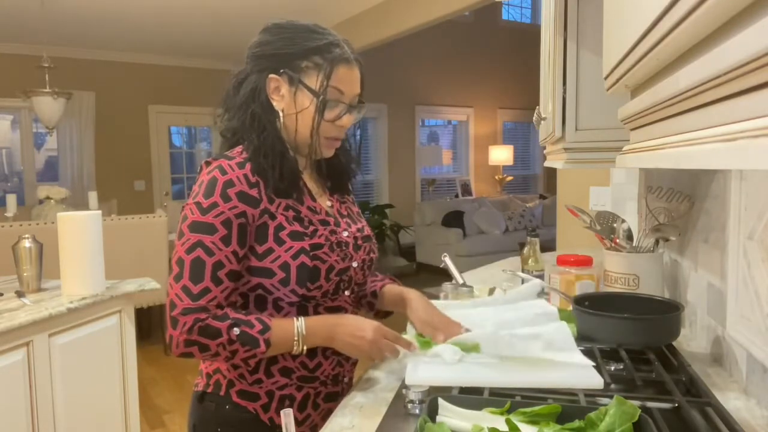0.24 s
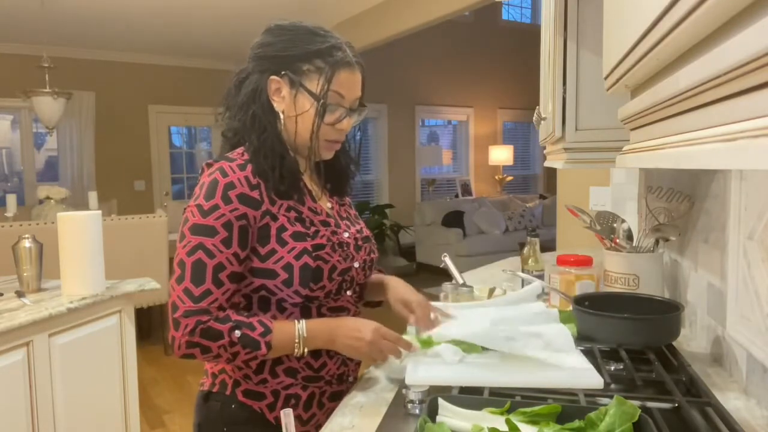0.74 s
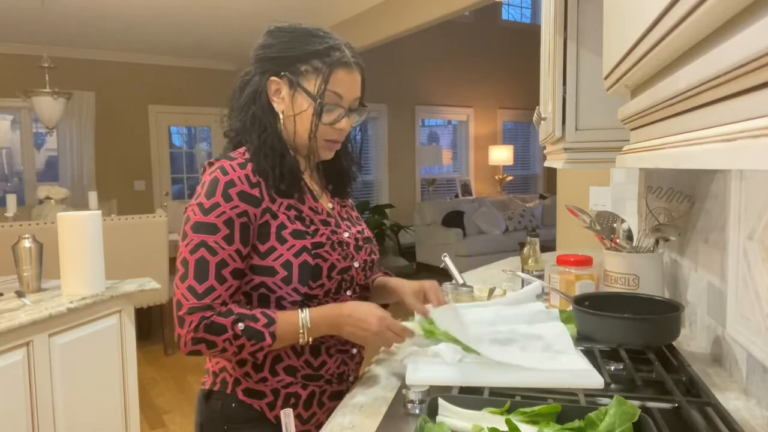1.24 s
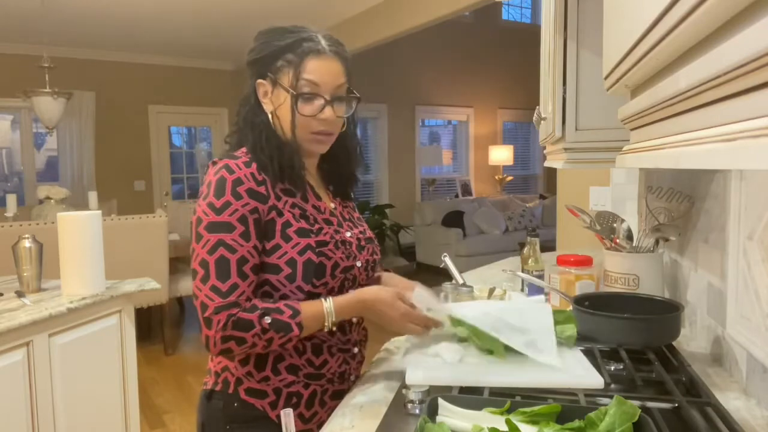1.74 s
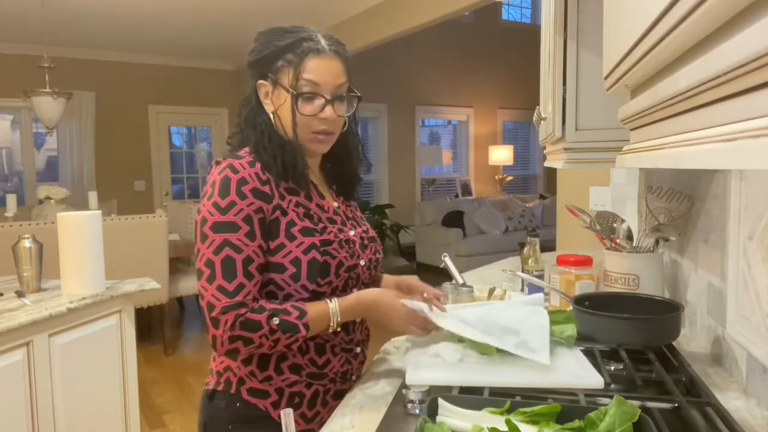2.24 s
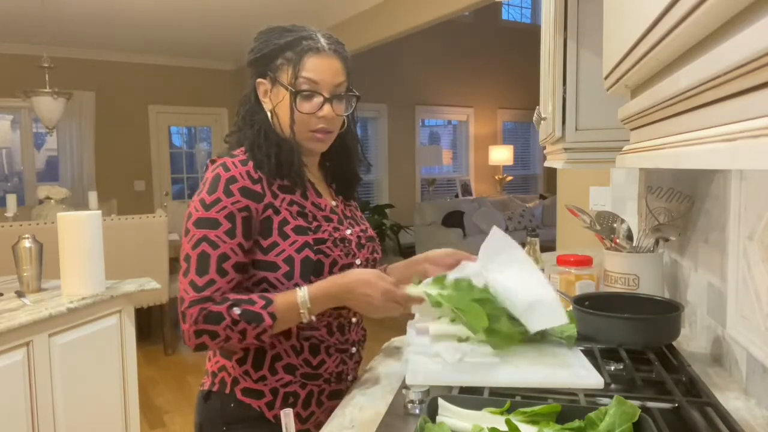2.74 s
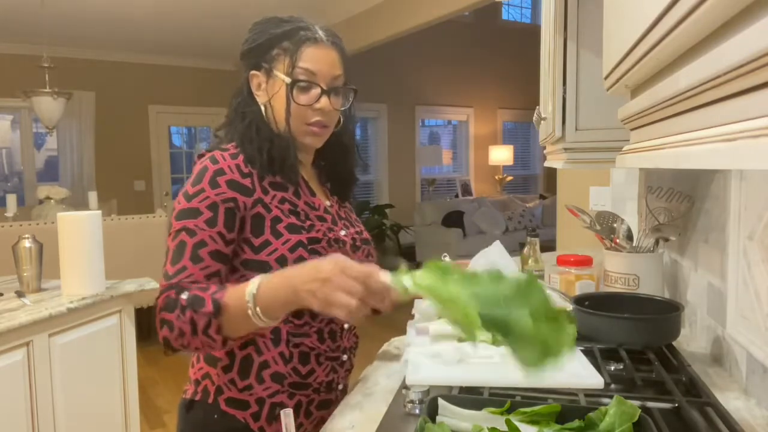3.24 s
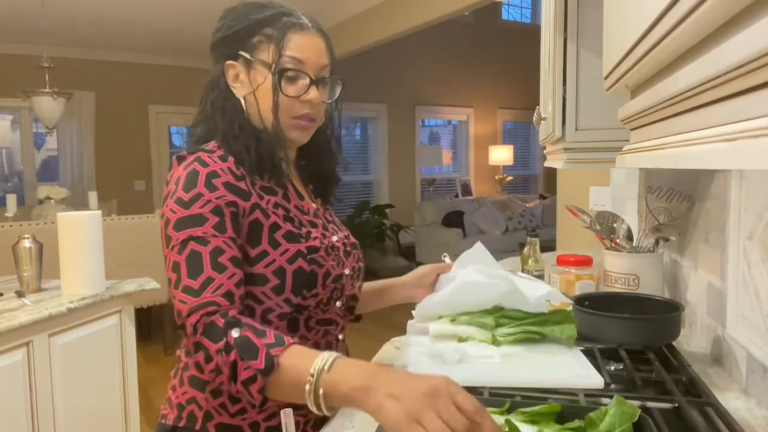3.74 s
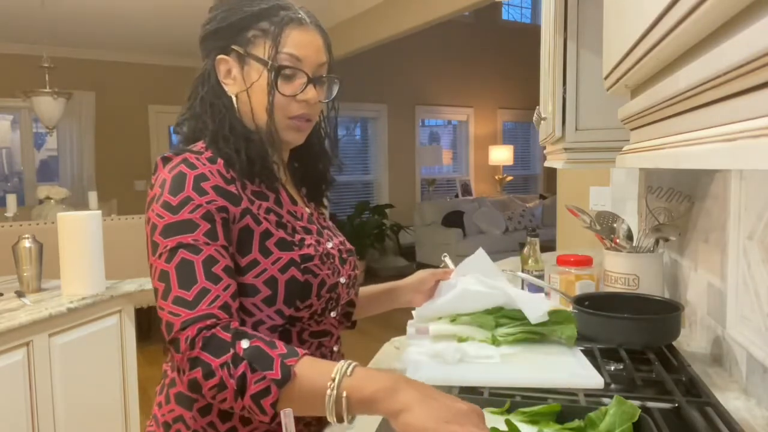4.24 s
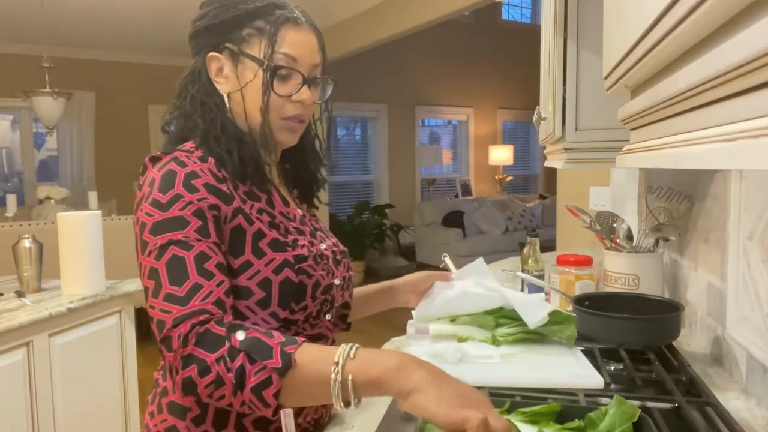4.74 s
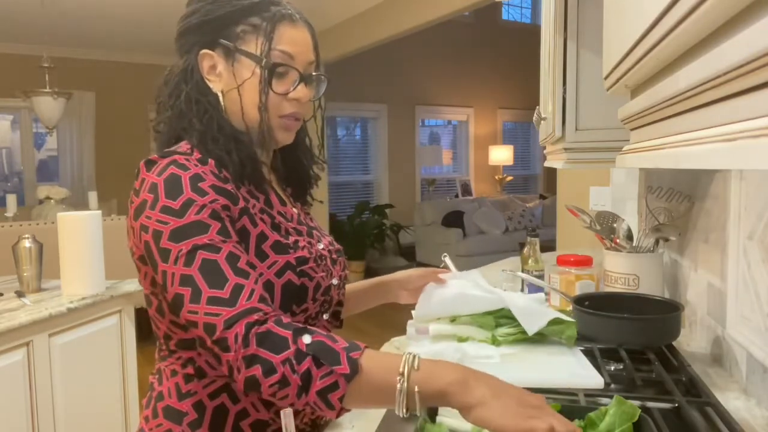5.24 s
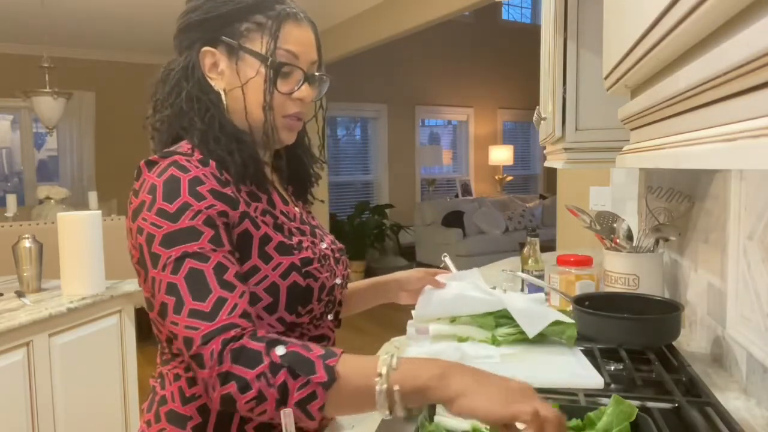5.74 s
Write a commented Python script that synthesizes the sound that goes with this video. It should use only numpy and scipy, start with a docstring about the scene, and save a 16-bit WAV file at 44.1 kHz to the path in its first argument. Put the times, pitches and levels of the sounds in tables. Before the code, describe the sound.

Wet leafy greens fry in hot oil, heard close in stereo in a home kitchen with short, slightly dull reflections. Throughout, a fine uneven hiss flickers and stutters, covered with dense tiny spits, bubbly ticks and crisp dry crackles. Below it sit a low, slowly throbbing motor hum, soft fan rumble and a very faint hollow note from the hood. Soft, low hand pats through paper on a board land around 0.3 and 1.0 seconds, again near 2.2 and 4.05, and very faintly at 5.9. Sharp pops gather from 0.48, with the loudest at about 0.68, ringing the steel pan briefly. Another strong snap comes at 2.24, then a rapid cluster with a dull pan knock at 3.85 to 3.9. The sizzle dips about 3.8 and surges at 4.05; a lower, knocking pop follows at 4.42. Smaller crackles continue, and the hiss strengthens toward six seconds.

```python
"""On a kitchen hob, wet leaves sear in hot oil close to a pair of microphones.
Motor hums beat together under air rumble and a faint hood note: sine waves and filtered noise.
The fizz is uneven noise in flickering bands. Spits, pops and crackles are bursting water drops:
noise and a click shaped into a bubble note, a dull knock and a bright crack that ring the pan.
A hand pats the board with low noise and a tone; short low knocks jolt the pan."""
import sys
import numpy as np
from scipy import signal
from scipy.fft import rfft, irfft, next_fast_len
from scipy.io import wavfile

SR = 44100
rng = np.random.default_rng(int(sys.argv[2]) if len(sys.argv) > 2 else 0)


def unload_wav(signal):
    """Save mono or channel-first audio to the path in sys.argv[1] as 16-bit WAV at rate SR, clipped to [-1, 1]."""
    wavfile.write(
        sys.argv[1],
        SR,
        np.round(np.clip(np.atleast_2d(signal).T, -1, 1) * 32767).astype(np.int16),
    )


N = 263277


def amp(db):
    """Turn decibels into a plain multiplier."""
    return 10 ** (np.asarray(db) / 20)


def rms_one(x):
    """Scale a sound so its average strength (rms) is 1."""
    return x / np.sqrt(np.mean(x ** 2) + 1e-20)


def in_time(rows):
    """Draw straight lines through timed rows, one value per sample for each column."""
    row_s, *columns = np.transpose(rows)
    return [np.interp(np.arange(N) / SR, row_s, column) for column in columns]


def at_hz(points, hz):
    """Read a curve at one pitch, with pitch spaced in octaves."""
    curve_hz, values = np.transpose(points)
    return np.interp(np.log(hz), np.log(curve_hz), values)


def butter(x, hz, kind, order=2):
    """Keep the low, high or middle part of a sound with a smooth filter."""
    return signal.sosfilt(signal.butter(order, hz, kind, fs=SR, output="sos"), x)


def resonance(x, hz, width_hz):
    """Ring at one pitch: a two-pole filter with gain 1 at its peak."""
    r = np.exp(-np.pi * width_hz / SR)
    top = np.array([1, 0, -1]) * (1 - r * r) / 2
    bottom = [1, -2 * r * np.cos(2 * np.pi * hz / SR), r * r]
    return signal.lfilter(top, bottom, x)


def drift(rate_hz):
    """Wander at random with spread 1: noise smoothed twice, one step every 40 samples."""
    r = np.exp(-80 * np.pi * rate_hz / SR)
    noise = rng.standard_normal(N // 40 + 2002)
    slow = signal.lfilter([1], [1, -2 * r, r * r], noise)[2000:]  # skip the filter's start
    return np.interp(np.arange(N) / 40, np.arange(len(slow)), rms_one(slow))


def spiky(shape, spread_db):
    """Make noise whose grains differ widely in strength, rms 1."""
    boost_db = spread_db * np.minimum(rng.exponential(1, shape), 5)
    return rms_one(rng.standard_normal(shape) * amp(boost_db))


def delay(ms, size):
    """Delay by turning the phase of each frequency, so parts of a sample count."""
    return np.exp(-2j * np.pi * np.arange(size // 2 + 1) / size * ms * SR / 1000)


# steady motor tones: pitch_hz, level_db (rms, before a small drift)
MOTOR_TONES = [(47.1, -66), (53.01, -52.8), (55.66, -54.3), (99.6, -63), (106.05, -54), (236.9, -64),
               (473.7, -68), (947.4, -72)]
IN_STEP_S = 2.97  # the moment when the motors pull together


def hum():
    """Add motor tones as sine waves; the close pair near 54 Hz throbs."""
    t = np.arange(N) / SR - IN_STEP_S
    out = 0
    for hz, db in MOTOR_TONES:
        level = np.sqrt(2) * amp(db + .7 * drift(1.5))
        out = out + level * np.cos(2 * np.pi * hz * t)
    return out


# tone of the fan and room rumble: pitch_hz, relative_level_db (per Hz)
AIR_TONE = [(18, -33), (30, -4), (59, 3.5), (108, 8), (126, 0), (183, -5.5), (257, -5.5), (347, -13),
            (468, -5.5), (517, -26), (631, -14), (717, -10.5), (900, -12), (1170, -49), (1980, -120)]
# how alike left and right are: pitch_hz, likeness (no unit, 1 is identical)
AIR_LIKENESS = [(60, 0.98), (130, 0.72), (290, 0.32), (640, 0.021)]
AIR_DB = -51  # whole rumble, rms


def air():
    """Fan and room rumble: noise in third-octave bands, alike left and right only in the bass."""
    white, out = rng.standard_normal((2, 2, N)), 0
    edges = 32 * 2 ** np.arange(0, 5, 1 / 3)
    for k, (low, high) in enumerate(zip(edges, edges[1:])):
        mid, side = butter(white[k % 2], [low, high], "band")
        hz = np.sqrt(low * high)
        alike = np.clip(at_hz(AIR_LIKENESS, hz), -1, 1)
        stereo = np.sqrt(1 + alike) * mid + np.sqrt(1 - alike) * side * [[1], [-1]]
        out = out + amp(at_hz(AIR_TONE, hz)) * stereo
    return amp(AIR_DB) * rms_one(out)


DUCT_HZ, DUCT_WIDTH_HZ, DUCT_DB = 270.7, 36, -57  # level is rms


def duct():
    """Air sings faintly in the hood: noise sent twice through one narrow resonance."""
    noise = rng.standard_normal((2, N))
    once = resonance(noise, DUCT_HZ, DUCT_WIDTH_HZ)
    return amp(DUCT_DB) * rms_one(resonance(once, DUCT_HZ, DUCT_WIDTH_HZ))


# strength of the frying: start_s, fizz_level_db, dull_boost_db (raises the fizz below 2500 Hz)
FRYING = [(0.0, -49, 4), (0.5, -51, 6), (0.7, -48, 7), (1.3, -49.5, 0), (1.95, -50.5, 3), (2.3, -49.5, 4.5),
          (2.77, -49, 0), (3.14, -51, 2.5), (3.79, -53, 6), (4.06, -47.5, 8.5), (4.4, -51, 7.5),
          (4.92, -49.5, 6.5), (5.44, -48.5, 7), (5.97, -45.5, 3)]
# tone of the fizz: pitch_hz, relative_level_db (per Hz)
FIZZ_TONE = [(300, -20), (600, -11), (1200, -8), (1900, -5), (2800, -4), (4500, 0), (7000, -1), (9000, -1),
             (12000, -3), (15500, -3)]


def fizz():
    """Fine frying noise in each quarter of the pan; neighbouring bands flicker partly together."""
    level_db, dull_db = in_time(FRYING)
    grains, out = spiky((2, 4, N), spread_db=6.5), 0
    sputter = drift(40.0)  # all bands stutter at once
    together = drift(7.0)
    edges = 350 * 2 ** np.arange(0, 5.6, .5)
    for k, (low, high) in enumerate(zip(edges, edges[1:])):
        hz = np.sqrt(low * high)
        flicker_db = 2.8 * together + 2.2 * drift(22.0) + 2.0 * sputter
        band_db = at_hz(FIZZ_TONE, hz) + flicker_db + dull_db * (hz < 2500)
        out = out + amp(band_db) * butter(grains[k % 2], [low, high], "band")
    return amp(level_db) * rms_one(out)


def fizz_db_at(start_s):
    """Look up the fizz level at given moments."""
    return np.interp(start_s, *np.transpose(FRYING)[:2])


BREAK = 9  # height of the first click over the rms of the unshaped spray
THUMP_DB = 5  # the click strikes the knock harder than the crack
SWELL_S, SWELL_DB = .005, -17  # a faint, short rise of noise leads into each burst


def bursts(rows, size):
    """Noise rises faintly, then a click and ragged spray make a bubble note, a knock and a crack."""
    start_s, db, hz, dull_db, bright_db, t60, dull_hz = np.transpose(rows)[:, :, None]
    first = SR // 50  # 20 ms of room for the faint rise
    t, out = (np.arange(size) - first) / SR, np.zeros((4, N + size))
    after = np.maximum(t, 0)
    fade = amp(-60 * after / np.maximum(t60, .005))
    snap = amp(8 - 60 * after / .014)
    swell = amp(SWELL_DB) * np.exp(-np.abs(t) / SWELL_S)
    shape = np.minimum(after / 0.0024, 1) * (fade + snap) + swell
    spray = spiky((len(start_s), 2, size), spread_db=4.5) * shape[:, None]
    # the skin breaks: one click through every band
    click_sign = rng.choice([-1, 1], (len(start_s), 1))
    spray[:, :, first + SR // 700] += BREAK * amp([THUMP_DB, 0]) * click_sign
    spray[:, 0] = butter(spray[:, 0], 3600, "low")  # the knock is a soft contact
    knock = butter(spray[:, 0], [600, 3000], "band")
    knock += 0.9 * butter(spray[:, 0], [260, 600], "band")
    crack = butter(spray[:, 1], 6200, "high")
    for k in range(len(start_s)):
        note = resonance(spray[k, 1], hz[k, 0], 0.4 * hz[k, 0])
        knock[k] += 5.0 * resonance(spray[k, 0], dull_hz[k, 0], 1.1 * dull_hz[k, 0])
        burst = amp(db[k]) * note / np.abs(note).max()
        # knock and crack are levelled over the first 20 ms
        burst += amp(dull_db[k]) * knock[k] / knock[k, first:2 * first].std()
        burst += amp(bright_db[k]) * crack[k] / crack[k, first:2 * first].std()
        at = round(start_s[k, 0] * SR)
        out[k % 4, at:at + size - first] += burst[first:]  # the quarters take turns
        out[k % 4, max(at - first, 0):at] += burst[max(first - at, 0):first]
    return out[:, :N]


SPITS_PER_S, SPIT_OVER_FIZZ_DB = 120, 9.5  # level before each drop's size is added


def spits():
    """Small drops burst at random moments; the louder the fizz, the louder the spits."""
    when, size, pitch, dull, bright, length = rng.random((round(SPITS_PER_S * N / SR), 6)).T
    start_s = when * N / SR
    db = fizz_db_at(start_s) + SPIT_OVER_FIZZ_DB - 3.5 * np.log(size + 0.06)  # few are loud
    dull_db, bright_db = db - 40 + 14 * dull, db - 30 + 14 * bright
    bubble_hz, knock_hz = 2000 * 3.6 ** pitch, 600 * 4.0 ** dull
    t60_s = 0.018 + 0.012 * length
    rows = [start_s, db, bubble_hz, dull_db, bright_db, t60_s, knock_hz]
    return bursts(np.transpose(rows), size=2200)


# listed drops, loud and faint, before the pan rings: start_s, bubble_peak_db, bubble_pitch_hz,
# knock_level_db, crack_level_db (both rms over 20 ms), t60_s (time to fade by 60 dB), knock_pitch_hz
LISTED_POPS = [(0.0212, -39, 5430, -48, -37.5, 0.055, 1430), (0.1513, -30, 4620, -49, -33.5, 0.051, 802),
               (0.3044, -24.5, 4740, -48, -41, 0.04, 746), (0.3559, -21.5, 3980, -69, -49, 0.074, 711),
               (0.3654, -48, 6000, -50, -37.5, 0.052, 756), (0.4619, -23, 4630, -46, -37, 0.089, 1580),
               (0.4828, -14.5, 3970, -46, -29.5, 0.075, 1730), (0.495, -42, 4400, -39, -50, 0.078, 1680),
               (0.5251, -20, 3580, -40.5, -35, 0.14, 810), (0.5319, -24, 5000, -42, -27.5, 0.065, 1520),
               (0.5473, -30, 2520, -41, -49, 0.051, 1630), (0.5685, -23, 4800, -58, -31.5, 0.027, 1140),
               (0.6391, -24.5, 4000, -63, -51, 0.13, 1510), (0.67, -28, 4700, -65, -57, 0.1, 1900),
               (0.677, -25, 5500, -50, -50, 0.04, 1900), (0.681, -3.5, 3670, -35, -51, 0.072, 765),
               (0.6845, -13, 2560, -31, -26, 0.035, 1900), (0.6935, -34, 2390, -38, -23, 0.12, 1630),
               (0.7757, -21, 4300, -49, -32, 0.04, 1170), (0.819, -18, 4650, -46, -40, 0.029, 1640),
               (0.8825, -45, 6680, -65, -48, 0.021, 1780), (0.9403, -26, 3640, -45, -40, 0.081, 1630),
               (1.0014, -24, 2940, -40, -47, 0.076, 1000), (1.0752, -30, 5600, -61, -35, 0.06, 1660),
               (1.1678, -37, 6410, -46.5, -55, 0.062, 2000), (1.26, -24.5, 4440, -73, -56, 0.043, 501),
               (1.285, -21, 6800, -51, -36, 0.12, 1320), (1.3374, -19.5, 4440, -48, -38.5, 0.065, 1180),
               (1.39, -15.5, 4840, -34, -64, 0.12, 1830), (1.4009, -36, 4720, -39, -35.5, 0.034, 1570),
               (1.4605, -50, 4860, -44.5, -69, 0.045, 680), (1.4768, -29, 5770, -54, -36, 0.037, 904),
               (1.5098, -25, 4400, -46, -34.5, 0.13, 1580), (1.6361, -22.5, 3230, -45, -41, 0.13, 755),
               (1.6848, -46, 6590, -47, -30.5, 0.11, 1580), (1.7353, -22.5, 4500, -44.5, -34, 0.071, 1680),
               (1.7606, -53, 6430, -47.5, -32, 0.057, 1900), (1.7978, -23, 6030, -37, -29, 0.089, 1100),
               (1.8866, -23.5, 4900, -48.5, -44, 0.13, 802), (1.9495, -23, 6800, -50.5, -34, 0.086, 1500),
               (2.0052, -30, 4060, -57, -53, 0.03, 1640), (2.1185, -23, 4420, -41.5, -36, 0.17, 1720),
               (2.2176, -47, 6660, -42, -32.5, 0.089, 1940), (2.2438, -9.5, 4800, -33, -34, 0.091, 1770),
               (2.3109, -20, 4020, -73, -30.5, 0.046, 1060), (2.4115, -20, 5850, -51.5, -37, 0.044, 1620),
               (2.4584, -31, 6000, -40, -35, 0.22, 2000), (2.5435, -32, 5530, -62, -33.5, 0.15, 1720),
               (2.6542, -25, 5000, -46, -33.5, 0.055, 1830), (2.6677, -25, 3650, -47.5, -38, 0.11, 1640),
               (2.708, -29, 3820, -61, -34.5, 0.064, 1570), (2.74, -25, 6450, -42, -31, 0.42, 1770),
               (2.7873, -29, 5400, -41, -56, 0.14, 1810), (2.83, -23.5, 4100, -58, -40, 0.29, 1810),
               (2.9028, -21.5, 4270, -66, -41, 0.066, 743), (3.1082, -22, 4260, -59, -38, 0.17, 851),
               (3.1883, -57, 6140, -53, -33.5, 0.087, 1490), (3.2435, -54, 6930, -47.5, -35, 0.054, 744),
               (3.2613, -22.5, 3120, -44, -52, 0.11, 1660), (3.2772, -32, 3480, -42.5, -36.5, 0.063, 1590),
               (3.3915, -20, 3300, -39.5, -30.5, 0.12, 1670), (3.434, -21, 3820, -61, -36, 0.14, 1930),
               (3.4817, -34, 5660, -46, -34, 0.32, 1570), (3.5528, -69, 3030, -48, -40, 0.046, 1650),
               (3.5882, -32, 5600, -64, -35, 0.021, 657), (3.6439, -20.5, 3300, -42, -61, 0.049, 1020),
               (3.7728, -24, 5900, -45, -51, 0.18, 1580), (3.845, -16, 4820, -24.5, -29.5, 0.046, 1500),
               (3.849, -16.5, 2520, -29, -53, 0.12, 1590), (3.8555, -17, 5650, -34, -29, 0.096, 1660),
               (3.868, -29, 2500, -34, -45, 0.11, 1500), (3.888, -40, 2400, -40, -43, 0.17, 1490),
               (3.9015, -17, 4760, -34, -37, 0.17, 1640), (3.91, -13, 4650, -30.5, -46, 0.11, 1630),
               (3.9877, -21, 2740, -32, -28, 0.11, 1820), (4.0547, -24, 5700, -49, -48, 0.021, 1560),
               (4.1047, -16, 3280, -41, -34, 0.092, 1650), (4.1385, -30, 2400, -46, -36, 0.044, 1050),
               (4.1815, -25.5, 5200, -60, -53, 0.07, 856), (4.1934, -31, 4090, -44.5, -55, 0.033, 786),
               (4.2431, -15, 4360, -44.5, -27, 0.089, 791), (4.2594, -20, 3570, -38.5, -34, 0.27, 1520),
               (4.303, -32, 4760, -43.5, -35, 0.071, 1500), (4.402, -43, 6000, -63, -39, 0.066, 800),
               (4.4105, -49, 2300, -45, -44, 0.046, 800), (4.4175, -19.5, 1750, -32, -33.5, 0.063, 900),
               (4.471, -28.5, 4170, -46, -33.5, 0.39, 807), (4.538, -25.5, 4300, -48, -35, 0.3, 1600),
               (4.561, -20.5, 3270, -47, -35, 0.12, 900), (4.582, -20, 4620, -64, -36, 0.08, 1920),
               (4.6096, -17.5, 5930, -40.5, -32.5, 0.14, 1570), (4.7067, -21, 2700, -48, -44, 0.074, 1600),
               (4.8675, -35, 5460, -43.5, -32, 0.12, 1610), (4.8796, -20, 6600, -41.5, -54, 0.041, 1970),
               (4.919, -24, 5850, -44, -33, 0.1, 1560), (4.9368, -26, 4330, -47, -34, 0.15, 1640),
               (5.0743, -20.5, 4200, -50, -43, 0.039, 1600), (5.1799, -50, 2360, -37, -37.5, 0.12, 1620),
               (5.289, -26, 2430, -40, -59, 0.15, 1610), (5.3217, -25, 2560, -35.5, -36, 0.098, 1710),
               (5.3454, -21, 4700, -50, -40, 0.3, 802), (5.4216, -29, 4400, -48, -37, 0.043, 1630),
               (5.439, -28, 4890, -42.5, -33.5, 0.075, 1580), (5.5772, -45, 5900, -47, -46, 0.087, 1560),
               (5.6842, -28, 4760, -48.5, -33, 0.023, 750), (5.8236, -24, 3550, -49, -45, 0.077, 1590),
               (5.8839, -54, 4900, -39, -36, 0.079, 1580)]


def pops():
    """Listed drops, loud and faint, burst at their listed moments."""
    return bursts(LISTED_POPS, size=6000)


# short dry crackles, before the pan rings: start_s, bubble_peak_db, bubble_pitch_hz
LISTED_CRACKLES = [(0.1052, -36, 4120), (0.175, -29, 5020), (0.3144, -29, 2940), (0.4419, -33, 6510),
                   (1.1364, -29.5, 5100), (1.2664, -36, 4470), (1.528, -27, 4390), (1.5534, -31, 5000),
                   (1.5784, -32, 6920), (1.6636, -21, 7360), (1.831, -24, 5900), (1.8984, -23, 4830),
                   (2.0971, -25.5, 3960), (2.1834, -21.5, 6000), (2.2997, -20, 6130), (2.4404, -41, 6100),
                   (2.5584, -44, 6440), (2.6034, -32, 5790), (2.6369, -35, 6070), (2.8679, -24, 5990),
                   (2.9124, -28, 4180), (3.0315, -47, 4800), (3.0634, -25.5, 2900), (3.0974, -47, 4500),
                   (3.3672, -27, 5040), (3.4044, -25, 6100), (3.456, -30, 7220), (3.47, -23.5, 6460),
                   (3.507, -29, 4700), (3.5324, -28, 6400), (3.6674, -29, 6790), (3.7224, -46, 6460),
                   (3.9974, -20, 2670), (4.7566, -33, 6730), (4.8379, -26, 4510), (5.1934, -34, 2850),
                   (5.5089, -25, 3740), (5.6151, -38, 5880), (5.9095, -25, 6770)]
# more at random moments: their middle level is over the fizz
CRACKLES_PER_S, CRACKLE_DB, CRACKLE_SPREAD_DB = 16, 14, 13
CRACKLE_T60_S = .035  # crisp ticks
CRACKLE_KNOCK_DB, CRACKLE_CRACK_DB = -34.5, -19  # middle levels under the bubble


def crackles():
    """Short dry bursts: some at listed moments, others at random, riding on the fizz level."""
    when, size, pitch = rng.random((round(CRACKLES_PER_S * N / SR), 3)).T
    random_s = when * N / SR
    random_db = fizz_db_at(random_s) + CRACKLE_DB + CRACKLE_SPREAD_DB * (size - .5)
    random_rows = zip(random_s, random_db, 3000 * 2.4 ** pitch)
    start_s, db, hz = np.transpose([*LISTED_CRACKLES, *random_rows])
    dull, bright = rng.random((len(start_s), 2)).T
    knock_db = db + CRACKLE_SPREAD_DB * (dull - .5) + CRACKLE_KNOCK_DB
    crack_db = db + CRACKLE_SPREAD_DB * (bright - .5) + CRACKLE_CRACK_DB
    t60_s = np.full_like(start_s, CRACKLE_T60_S)
    rows = [start_s, db, hz, knock_db, crack_db, t60_s, 600 * 2.9 ** dull]
    return bursts(np.transpose(rows), size=3000)


# ringing notes of the steel pan: pitch_hz, width_hz, level_db (gain)
PAN_NOTES = [(697, 174, -6.5), (1622, 8, 2), (2412, 73, -8.5), (4650, 130, -36.5)]


def pan(x):
    """The steel rings along with each burst through a set of resonances."""
    return x + sum(amp(db) * resonance(x, hz, width_hz) for hz, width_hz, db in PAN_NOTES)


# hand on the board: start_s, peak_db, t60_s (time to fade by 60 dB), paper_over_board_db
HAND_PATS = [(0.269, -37.5, 0.15, 1), (0.301, -35, 0.25, -19), (0.957, -35.5, 0.3, -4),
             (0.99, -31.5, 0.33, -13), (2.209, -39, 0.24, -8), (2.259, -44, 0.13, -16),
             (4.055, -33, 0.22, -5), (5.899, -39, 0.045, -12)]
BOARD_HZ, BOARD_RING = 101.4, 0.81  # the board's own note and its share


def pats():
    """Soft pushes through paper on a board: low noise and a tone that swell and die."""
    t, out = np.arange(12000) / SR, np.zeros(N + 12000)
    noises = rng.standard_normal((len(HAND_PATS), 12000))
    for (start_s, db, t60, paper_db), noise in zip(HAND_PATS, noises):
        board = rms_one(resonance(resonance(noise, 113, 37), 87.5, 42))
        ring = BOARD_RING * np.sin(2 * np.pi * BOARD_HZ * t)
        paper = rms_one(butter(noise, [250, 470], "band"))
        thud = board + ring + amp(paper_db) * paper
        thud = thud * amp(-60 * t / t60) * np.minimum(t / 0.016, 1)
        out[round(start_s * SR):][:12000] += amp(db) * thud / np.abs(thud).max()
    return out[:N]


# jolts of the pan on the hob: start_s, knock_peak_db, knock_pitch_hz, thud_over_knock_db
PAN_JOLTS = [(0.533, -28, 735, -14), (0.6825, -23.5, 705, -10.5), (1.0024, -34, 790, -9),
             (1.391, -28, 1000, -24), (1.4615, -26.5, 680, -18), (1.799, -27, 990, -19),
             (2.245, -23, 910, -23), (3.8465, -17, 770, -16), (4.195, -32, 750, -11),
             (4.4185, -19, 720, -13.5)]
JOLT_CYCLES, THUD_HZ, THUD_WIDTH_HZ = 2.6, 260, 190  # cycles: knock pitch over its width


def jolts():
    """The pan is pushed on the hob: a short knock of a cycle or two, and a lower thud under it."""
    click, out = np.eye(1, 2000)[0], np.zeros((4, N + 2000))
    thud = resonance(resonance(click, THUD_HZ, THUD_WIDTH_HZ), THUD_HZ, THUD_WIDTH_HZ)
    for start_s, db, hz, thud_db in PAN_JOLTS:
        knock = resonance(resonance(click, hz, hz / JOLT_CYCLES), hz, 2 * hz)
        push = knock / np.abs(knock).max() + amp(thud_db) * thud / np.abs(thud).max()
        out[0, round(start_s * SR):][:2000] -= amp(db) * push
    return out[:, :N]


# one row for each quarter of the pan: wall_delay_ms (dull sound off the walls round the hob, left
# later; below zero, right later), direct_delay_ms (treble on the straight path, right later)
QUARTER_PATHS = [(.18, .162), (1.27, .17), (.22, .165), (-1.2, .168)]
ECHO_CUT_HZ = 7100  # above this the straight path wins
LEFT_DIP_HZ, LEFT_DIP_DB = 700, -2.5  # the left microphone is shaded in the low middle


def near_paths(quarters):
    """Treble takes the straight path, the rest goes by way of the wall, so each side hears it apart."""
    size = next_fast_len(N + 2048)
    dull = rfft(butter(quarters, ECHO_CUT_HZ, "low", order=4), size)
    bright = rfft(butter(quarters, ECHO_CUT_HZ, "high", order=4), size)
    left, right = 0, 0
    for low, high, (wall, direct) in zip(dull, bright, QUARTER_PATHS):
        left = left + high + low * delay(max(wall, 0), size)
        right = right + low * delay(max(-wall, 0), size) + high * delay(direct, size)
    left, right = irfft([left, right], size)[:, :N]
    dip = (amp(LEFT_DIP_DB) - 1) * resonance(left, LEFT_DIP_HZ, LEFT_DIP_HZ)
    return np.array([left + dip, right])


# time to fade by 60 dB in the bass, where the walls start to dull, and gain
KITCHEN_T60_S, WALL_CUT_HZ, KITCHEN_DB = 0.12, 9000, -9


def kitchen(x):
    """The room echoes: eight feedback delays a side, duller on every round."""
    size = next_fast_len(N + SR)
    turn = 2 * np.pi * np.arange(size // 2 + 1) / size
    wall = 1 / (1 + 1j * turn * SR / (2 * np.pi * WALL_CUT_HZ))
    echoes = np.zeros((2, len(turn)), complex)
    for k, lag_s in enumerate(rng.uniform(0.0065, 0.03, 16)):
        loop = amp(-60 * lag_s / KITCHEN_T60_S) * wall * np.exp(-1j * turn * lag_s * SR)
        echoes[k % 2] += (-1) ** (k // 2) * loop / (1 - loop)
    return amp(KITCHEN_DB) * irfft(echoes * rfft(x, size), size)[:, :N]


def scene():
    """Place the frying pan in the kitchen, with the pats, over the hum and air."""
    frying = fizz() + pan(spits() + crackles() + pops()) + jolts()
    room = kitchen(frying.sum(axis=0))
    return near_paths(frying) + room + pats() + hum() + air() + duct()


def record(dry):
    """The microphones lose the deep bass and step down at the very top; a steep cut follows."""
    no_deep_bass = butter(dry, 35, "high", order=4)
    step = signal.cheby2(10, 16, 15950, fs=SR, output="sos")
    steep_cut = signal.cheby2(12, 50, 17150, fs=SR, output="sos")
    return signal.sosfilt(steep_cut, signal.sosfilt(step, no_deep_bass))


dry = scene()
out = record(dry)
unload_wav(out)
```